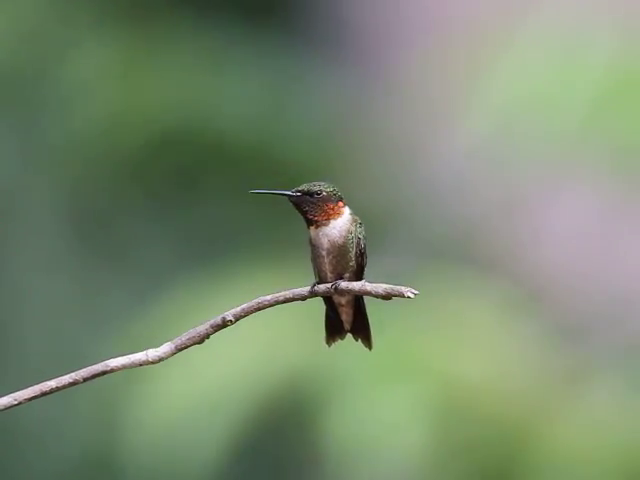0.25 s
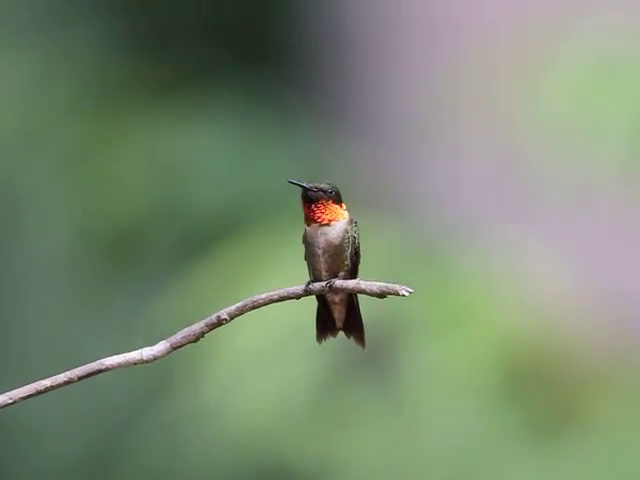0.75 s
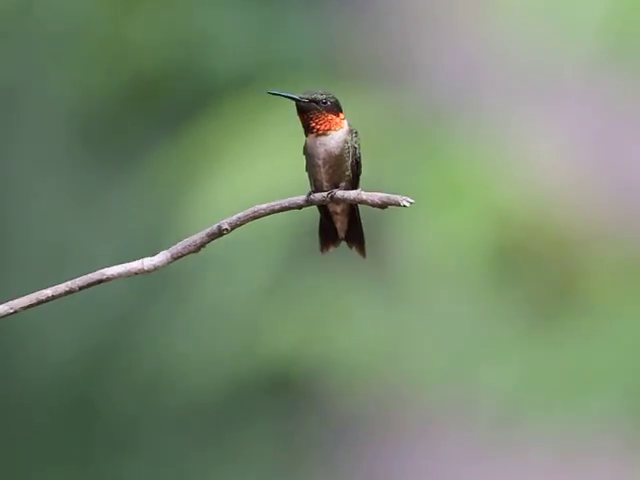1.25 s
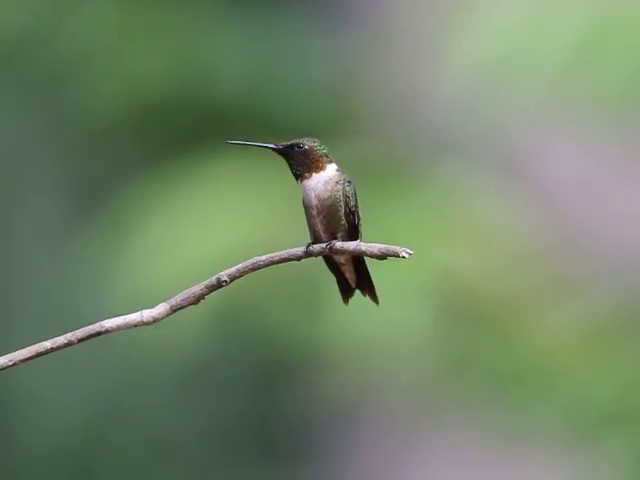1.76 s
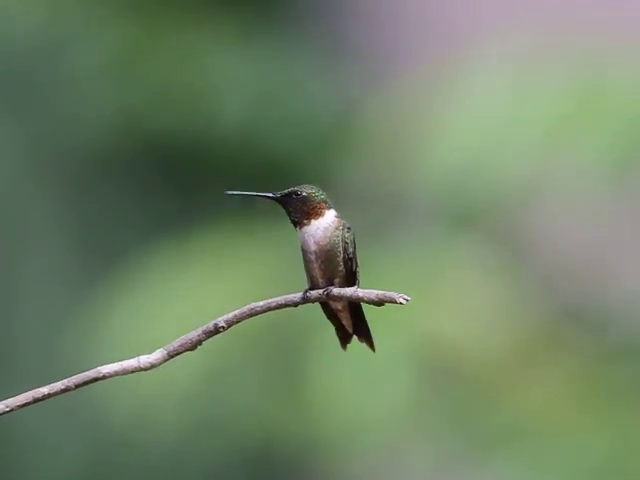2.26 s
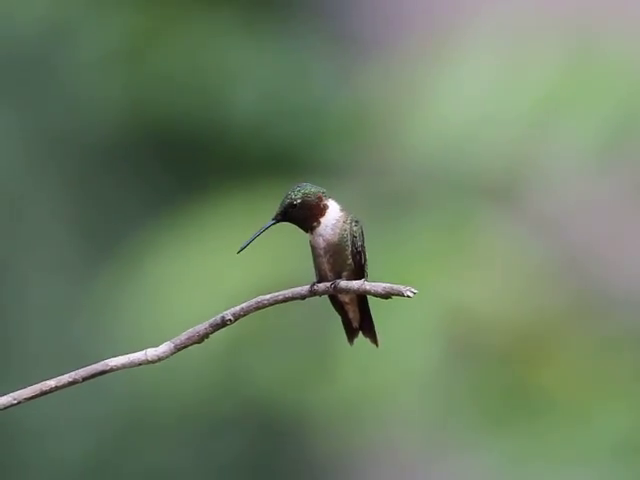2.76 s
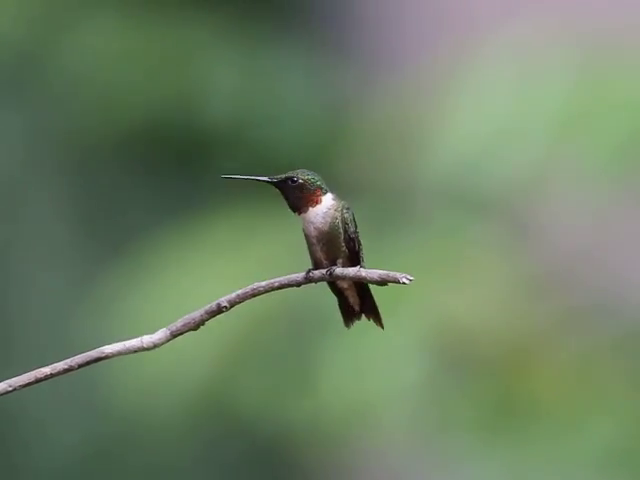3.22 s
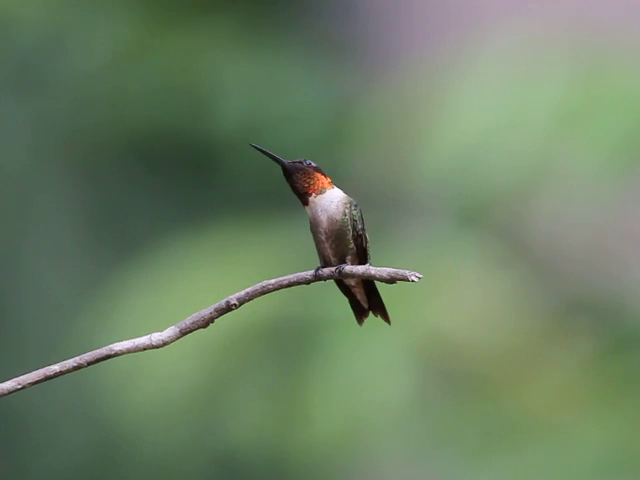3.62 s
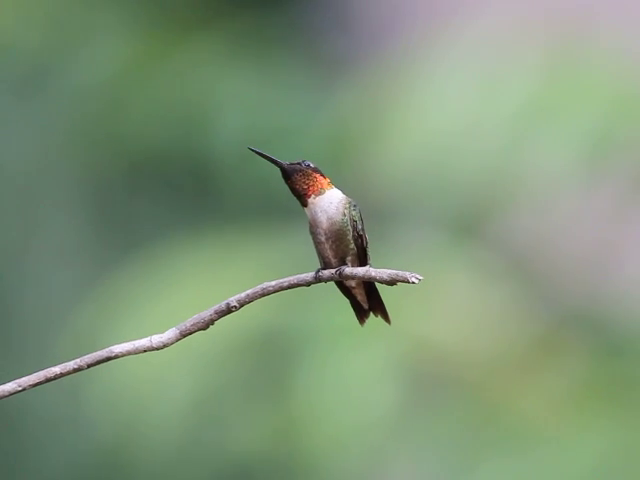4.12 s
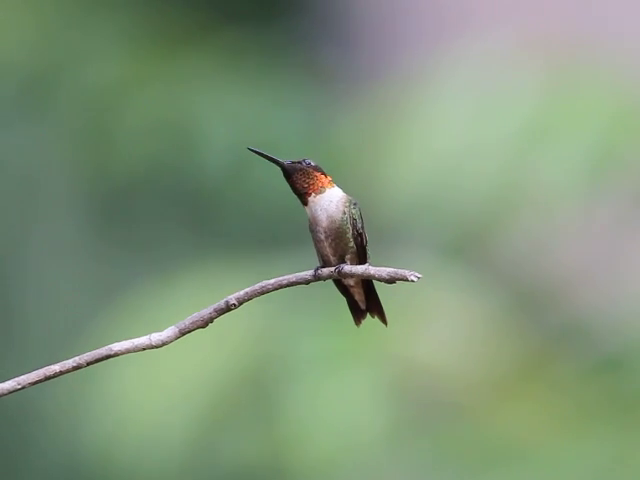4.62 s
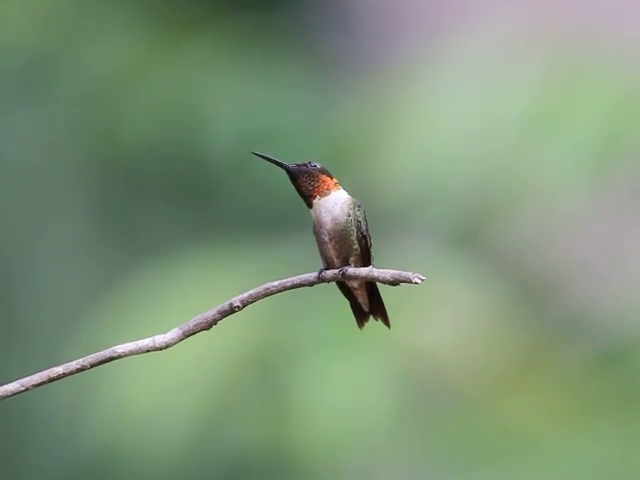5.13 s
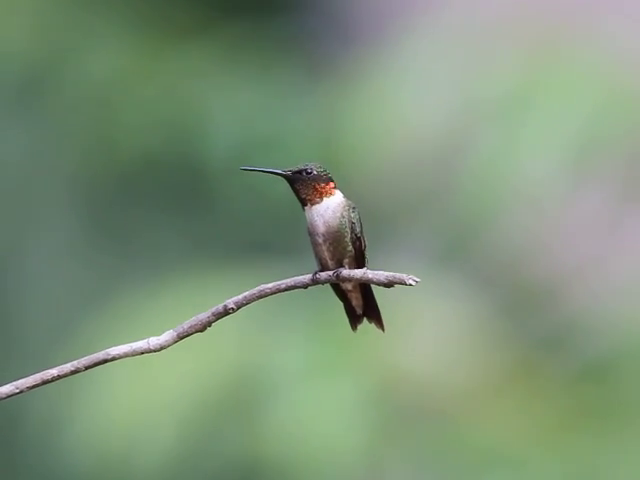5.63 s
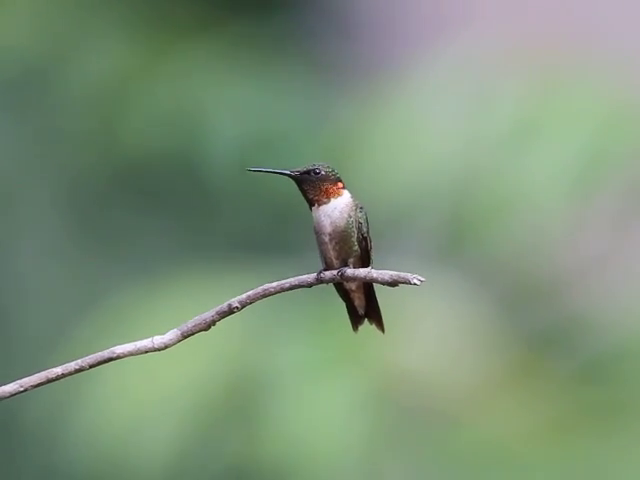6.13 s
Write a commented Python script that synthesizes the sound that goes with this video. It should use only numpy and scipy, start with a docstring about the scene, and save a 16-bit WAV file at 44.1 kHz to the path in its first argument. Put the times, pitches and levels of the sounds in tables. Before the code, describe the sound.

Sparse, squeaky hummingbird chips scatter off trees above a quiet airy background, interrupted midway by sharp handling clicks and a loud snap at the microphone.

```python
"""Outdoors: a soft rush, a band of insect hiss and a faint, steady whine run throughout; a low hum fades early on.
From 0.8 s a perched hummingbird gives thin chips, each a fast upward sweep that scatters in the trees.
Fainter chips answer from farther off, and a faint drone swells to 1.66 s and sinks.
From 3.2 s dry clicks of noise and ringing sound close to the microphone.
A hard snap of short modes at 3.6 s makes the gain control duck; the level then creeps back."""
import sys
import numpy as np
from scipy import signal
from scipy.fft import rfft, irfft, next_fast_len
from scipy.io import wavfile
from scipy.ndimage import uniform_filter1d, map_coordinates

SR = 44100
rng = np.random.default_rng(int(sys.argv[2]) if len(sys.argv) > 2 else 0)


def log_audio(samples):
    """Write samples as a 16-bit WAV file to the path given in sys.argv[1]."""
    # one column per channel
    frames = np.atleast_2d(samples).T
    # limit to full scale, then quantise
    limited = np.clip(frames, -1, 1)
    pcm = np.round(limited * 32767).astype(np.int16)
    wavfile.write(sys.argv[1], SR, pcm)


N = 281358  # samples

# Bird chips, near and far: t/s, level/dB, f/Hz that the leap approaches, length/s,
# fade over the chip/dB, octave against the fundamental/dB, near echo/dB
CHIPS = [ (0.8325, -41, 7230, 0.027, 1, -1, 3), (1.808, -49, 6300, .03, -3, -11, -1),
         (1.981, -20.5, 7460, .027, 17.5, -9.5, -6), (2.302, -46, 6700, .02, -3, -22, -12),
         (2.323, -49, 6700, .032, -9, -22, -11), (2.928, -20, 7300, 0.029, 7.5, -2.5, -5.5),
         (4.1224, -10.5, 7170, 0.039, 24.5, -5.5, -9.5), (5.467, -37, 6550, 0.028, 5, -7, -2),
         (5.603, -17.5, 6940, 0.034, 11, -6, -6.5), (5.859, -39, 6500, .032, 2, -13, -7)]
# Dry clicks close to the microphone: t/s, level/dB, ring f/Hz, knock against the click/dB
CLICKS = [ (3.211, -30, 4500, -5), (3.222, -29, 4500, -10), (3.2725, -5.5, 4460, -28),
          (3.335, -24.5, 3500, -8), (3.374, -21, 2900, -3.5), (3.553, -27.5, 3000, -6),
          (3.820, -31.5, 3500, 2.5), (4.812, -20.5, 3200, -22), (5.424, -20.5, 3200, -17),
          (5.640, -29, 2520, 0.5)]
# Modes of the one hard snap: f/Hz, level/dB, t60/s
SNAP_MODES = [(352, -28, 0.033), (1170, -18, 0.017), (1300, -22.5, 0.024), (2020, -18, 0.011),
              (2760, -13.5, 0.019), (3270, -16.5, 0.017), (3930, -6, 0.0075), (7404, 1, 0.0033),
              (8030, -1.5, 0.0041), (8770, -21, 0.019), (10000, -18, 0.0071)]
# Steady tones of the whine: f/Hz, level/dB rms
WHINE_TONES = [(349, -56.5), (481, -56), (765, -67), (1038, -60), (1153, -57.5), (1268, -57), (1326, -60.5),
               (1384, -49.5), (1442, -53), (2076, -59), (2212, -61.5), (2503, -79), (2822, -66),
               (15720, -53)]
# Noise colours, all with the columns f/Hz, relative density/dB per Hz
FAR_INSECT_SPECTRUM = [(8800, -35), (9200, -4), (9550, 3), (9900, -38)]  # one distant rasp
DRONE_SPECTRUM = [(600, -38), (730, -1), (790, 7), (850, -7), (1000, -48)]  # narrow far drone
# Insect chorus: f/Hz, relative density/dB per Hz
INSECT_SPECTRUM = [(6300, -27), (6900, -9), (7300, -2), (8150, 1.5), (8650, -5), (9000, -14.5), (9800, -22)]
# Low hum: f/Hz, relative density/dB per Hz
HUM_SPECTRUM = [(70, -24), (125, -3), (160, 6), (210, -0.5), (280, -10.5), (500, -59)]
# Outdoor rush: f/Hz, relative density/dB per Hz
AIR_SPECTRUM = [(15, -49), (25, -19), (74, -2.5), (161, -1), (204, -1.5), (235, 1), (319, -6.5),
                (351, -5.5), (444, -6), (781, -6), (922, -8.5), (1410, -8), (1830, -13.5), (3150, -19),
                (6370, -29.5), (7000, -43), (9100, -58), (15400, -120)]
# Microphone hiss: f/Hz, relative density/dB per Hz
HISS_SPECTRUM = [(5000, -23), (9000, -9), (10500, -1), (11700, -6), (13300, 0.5), (14700, -3), (15500, 6),
                 (15900, -7)]

# A chip at 0 dB leaps from this low note, then climbs steadily; softer chips start higher
CHIP_START_HZ, CHIP_START_HZ_PER_DB = 5090, 16
CHIP_LEAP_S, CHIP_CLIMB_HZ_PER_S = 0.00505, 35600
# The long foliage tail against the near scatter; it grows faster as a chip gets wetter
FOLIAGE_DB, FOLIAGE_GROWTH = -4.5, 1.27
# A soft click; harder ones die sooner (dB to halve the decay) and ring more (dB per dB)
CLICK_SOFT_DB, CLICK_T60_S, CLICK_RING_DB = -25, 0.014, -13
CLICK_HALVING_DB, CLICK_RING_PER_DB = 10.5, 1.15
SNAP_S = 3.6058
DRONE_DB, DRONE_PEAK_S, DRONE_SLOPE_DB_PER_S = -47, 1.66, 6.5
HUM_DB, HUM_HOLD_S, HUM_FADE_DB_PER_S, HUM_REST_DB = -36, 0.36, 19, -56.5
TOP_HZ = 16000  # upper band limit of the recorder


def amp(db):
    """Convert dB to an amplitude factor."""
    return 10 ** (np.asarray(db) / 20)


def unit(x):
    """Scale a signal to rms 1."""
    return x / np.sqrt(np.mean(x ** 2) + 1e-20)


def wobble(rate):
    """A smooth random curve with rate knots a second."""
    knots = rng.standard_normal(int(N * rate / SR) + 4)
    return map_coordinates(knots, [np.arange(N) * rate / SR])


def filtered(x, response):
    """Shape the spectrum of x by a response given over frequency in Hz."""
    m = next_fast_len(N + SR // 2)
    hz = np.fft.rfftfreq(m, 1 / SR)
    return irfft(rfft(x, m) * response(hz), m)[:N]


def noise(spectrum):
    """Noise of rms 1, coloured by (f/Hz, density/dB) points joined on a log frequency axis."""
    f, db = np.transpose(spectrum)
    white = rng.standard_normal(N)
    return unit(filtered(white, lambda hz: amp(np.interp(np.log(hz + 1), np.log(f), db))))


def add(track, s, sound):
    """Mix a sound into the track at time s."""
    part = track[round(s * SR):][:len(sound)]
    part += sound[:len(part)]


def chips(attack=0.0041, release=0.0051, hold=0.00258, overtone_fade_db=11, overtone_attack=0.004,
          flutter_db=2.0, waver_hz=70):
    """Each chip is a whistle that catches on a low note, leaps up and climbs on, its octave weakening."""
    out = np.zeros(N)
    for s, db, top_hz, length, fade_db, overtone_db, echo_db in CHIPS:
        t = np.arange(int(length * SR)) / SR
        # pitch, strength and octave waver from one few milliseconds to the next (400 knots a second)
        curves = rng.standard_normal((3, 40))
        bend, flutter, colour = (map_coordinates(knots, [t * 400]) for knots in curves)
        start_hz = CHIP_START_HZ - CHIP_START_HZ_PER_DB * db
        leap_hz = top_hz + (start_hz - top_hz) * np.exp(-np.maximum(t - hold, 0) / CHIP_LEAP_S)
        pitch_hz = leap_hz + CHIP_CLIMB_HZ_PER_S * t + waver_hz * bend
        phase = 2 * np.pi * np.cumsum(pitch_hz) / SR
        edges = np.clip(np.minimum(t / attack, (length - t) / release), 0, 1)
        gate = np.sin(np.pi / 2 * edges) ** 2
        # the octave grows only once the syrinx swings fully
        octave_db = overtone_db - overtone_fade_db * t / length + flutter_db * colour
        octave = np.minimum(t / overtone_attack, 1) * amp(octave_db)
        whistle = np.sin(phase) + octave * np.sin(2 * phase)
        call = np.sqrt(2) * amp(db - fade_db * t / length + flutter_db * flutter) * gate * whistle
        echo = trees(twig_db=-15.5, near_db=echo_db, near_t60=0.18,
                     far_db=FOLIAGE_GROWTH * echo_db + FOLIAGE_DB, far_t60=0.6, gap=0.0033, dull_hz=9000)
        add(out, s, call)
        add(out, s, signal.fftconvolve(call, echo))
    return out


def trees(twig_db, near_db, near_t60, far_db, far_t60, gap, dull_hz):
    """Echo of one call: a few distinct bounces, quick scatter nearby, then a long dull foliage tail."""
    t = np.arange(SR // 2) / SR
    decay = amp(-60 * t / np.array([[near_t60], [far_t60]]))
    near, far = rng.standard_normal((2, len(t))) * decay * (t > gap)
    lowpass = signal.butter(1, dull_hz, fs=SR, output="sos")
    far = signal.sosfilt(lowpass, far)
    echo = amp(near_db) * near / np.linalg.norm(near) + amp(far_db) * far / np.linalg.norm(far)
    delays = gap * rng.uniform(0.72, 2.5, size=3)
    echo[(delays * SR).astype(int)] += amp(twig_db)
    return echo


def snap(level_db=5, crack_db=-14, rattle_db=-39, attack=0.00027, lead_in_db=-27, lead_in_t60=0.02):
    """One hard snap by the microphone: short modes, crack, rattle; a faint noise burst swells just before it."""
    out, t = np.zeros(N), np.arange(SR // 10) / SR
    ring = sum(amp(db - 60 * t / t60) * np.sin(2 * np.pi * hz * t) for hz, db, t60 in SNAP_MODES)
    crack = amp(crack_db) * burst(t, 640, 12000, 0.013)
    rattle = amp(rattle_db) * burst(t, 700, 4500, 0.076)
    # a reversed burst swells up to the snap
    lead_in = amp(level_db + lead_in_db) * burst(t, 3200, 7400, lead_in_t60)[::-1]
    add(out, SNAP_S - len(t) / SR, lead_in)
    add(out, SNAP_S, amp(level_db) * (ring + crack + rattle) * (1 - np.exp(-t / attack)))
    return out


def clicks(attack=0.00014, ring_attack=0.00056, grit_db=-9):
    """Dry ticks: broad grit, a few cycles of one resonance, a dull knock; harder ones ring more, die sooner."""
    out, t = np.zeros(N), np.arange(SR // 10) / SR
    for s, db, hz, knock_db in CLICKS:
        force_db = db - CLICK_SOFT_DB
        t60 = CLICK_T60_S * 2 ** (-force_db / CLICK_HALVING_DB)
        ring_db = CLICK_RING_DB + CLICK_RING_PER_DB * force_db
        ring_onset = 1 - np.exp(-(t / ring_attack) ** 2)
        ring = amp(ring_db - 60 * t / t60) * np.sin(2 * np.pi * hz * t) * ring_onset
        grit = amp(grit_db) * burst(t, 0.75 * hz, 8600, t60)
        knock = amp(knock_db) * burst(t, 510, 1320, 0.039)
        add(out, s, amp(db) * (ring + grit + knock) * (1 - np.exp(-t / attack)))
    return out


def burst(t, low_hz, high_hz, t60):
    """A band of noise that starts at once and dies away by 60 dB in t60 seconds."""
    band = signal.butter(2, [low_hz, high_hz], "band", fs=SR, output="sos")
    return unit(signal.sosfilt(band, rng.standard_normal(len(t)))) * amp(-60 * t / t60)


def far_insect(level_db=-69, pulse_db=4):
    """One distant insect rasps irregularly between two levels: a random curve squashed by tanh."""
    pulses = np.tanh(2 * wobble(16))
    return amp(level_db + pulse_db * pulses) * noise(FAR_INSECT_SPECTRUM)


def insects(level_db=-50):
    """The insect chorus: a steady band of hiss with a slight waver."""
    return amp(level_db + 0.44 * wobble(5.9)) * noise(INSECT_SPECTRUM)


def drone():
    """A faint, narrow band of noise far away swells to one peak and sinks as fast."""
    level_db = DRONE_DB - DRONE_SLOPE_DB_PER_S * np.abs(np.arange(N) / SR - DRONE_PEAK_S)
    return amp(level_db) * noise(DRONE_SPECTRUM)


def hum():
    """Low noise that holds, then fades by steady dB per second to a trace, wavering throughout."""
    fading_s = np.maximum(np.arange(N) / SR - HUM_HOLD_S, 0)
    level_db = np.maximum(HUM_DB - HUM_FADE_DB_PER_S * fading_s, HUM_REST_DB)
    return amp(level_db + 1.3 * wobble(9.4)) * noise(HUM_SPECTRUM)


def air(level_db=-37.5):
    """The soft outdoor rush: broad, mostly low noise of nearly constant level."""
    return amp(level_db + 0.15 * wobble(5.06)) * noise(AIR_SPECTRUM)


def whine(drift_hz=1.17, waver_db=1.5):
    """Thin sine tones, slightly unsteady in pitch and level, likely from the camera's electronics."""
    out = np.zeros(N)
    for hz, db in WHINE_TONES:
        phase = 2 * np.pi * np.cumsum(hz + drift_hz * wobble(8)) / SR
        out += np.sqrt(2) * amp(db + waver_db * wobble(4.13)) * np.sin(phase)
    return out


def microphone_hiss(level_db=-60):
    """The microphone's own constant noise, mostly treble."""
    return amp(level_db) * noise(HISS_SPECTRUM)


def scene():
    """Sum the bird, the close clicks and the background at one microphone."""
    close = chips() + snap() + clicks()
    distant = far_insect() + insects() + drone() + hum() + air()
    return (close + distant + whine() + microphone_hiss())[None]


def record(dry, threshold_db=-0.5, recovery_db_per_s=15):
    """Gain control ducks at a peak and creeps back; the recorder clips at full scale and limits the band."""
    x = dry[0]
    over_db = np.maximum(20 * np.log10(np.abs(x) + 1e-9) - threshold_db, 0)
    # a running maximum on a rising ramp holds each peak and lets it recover at the ramp's slope
    ramp_db = recovery_db_per_s * np.arange(N) / SR
    duck_db = np.maximum.accumulate(over_db + ramp_db) - ramp_db
    ducked = x * amp(-uniform_filter1d(duck_db, size=16))
    clipped = np.clip(ducked, -1, 1)
    return filtered(clipped, lambda hz: hz < TOP_HZ)[None]


dry = scene()
out = record(dry)
log_audio(out)
```